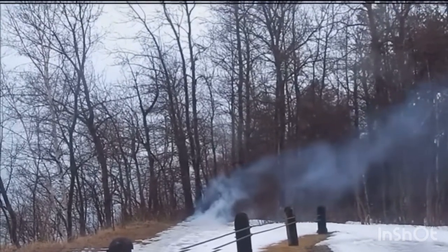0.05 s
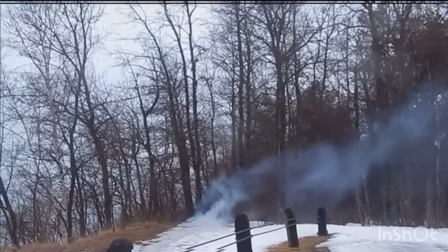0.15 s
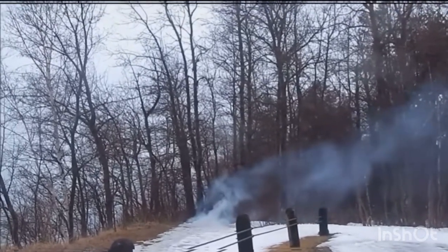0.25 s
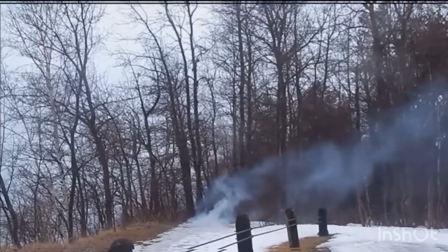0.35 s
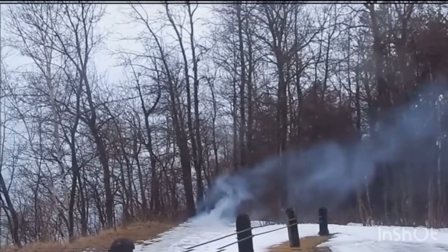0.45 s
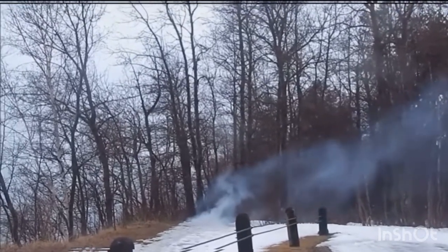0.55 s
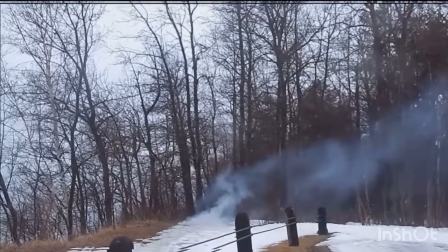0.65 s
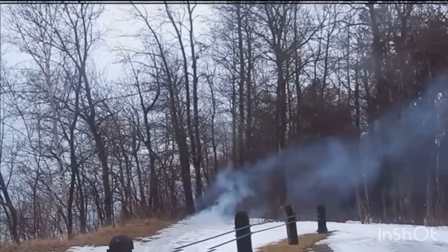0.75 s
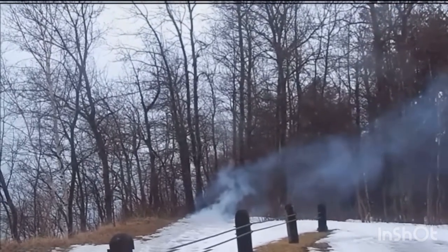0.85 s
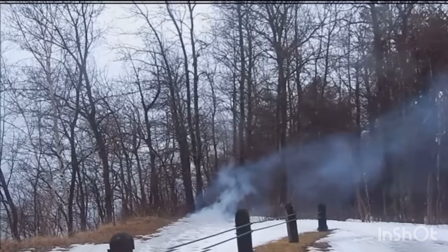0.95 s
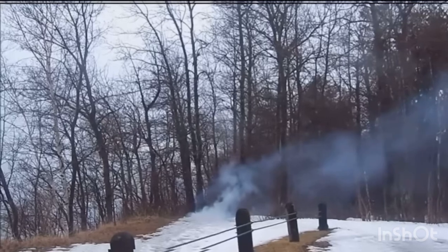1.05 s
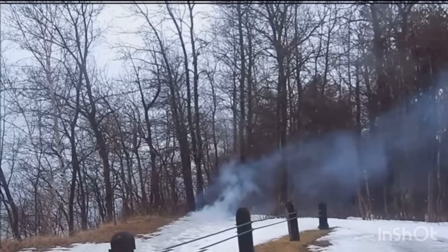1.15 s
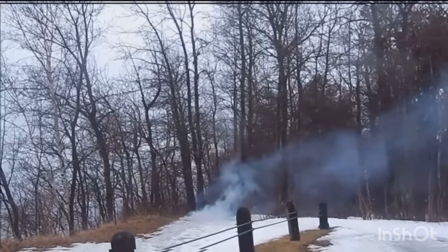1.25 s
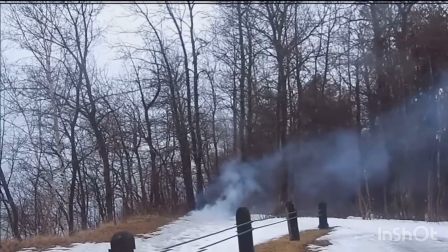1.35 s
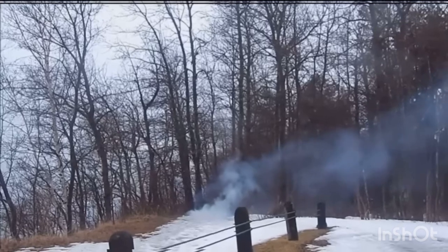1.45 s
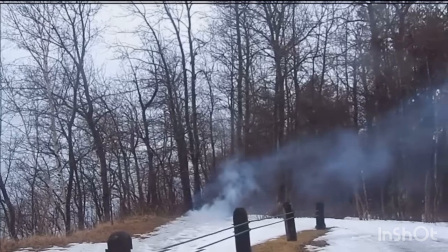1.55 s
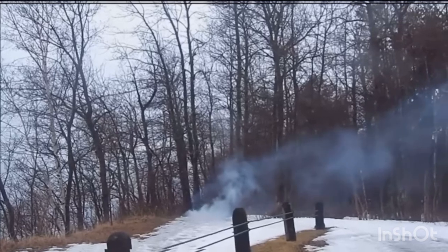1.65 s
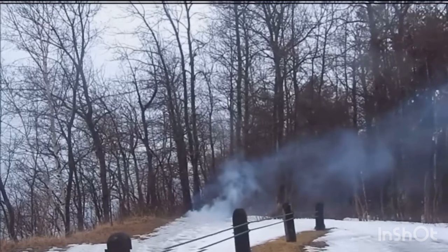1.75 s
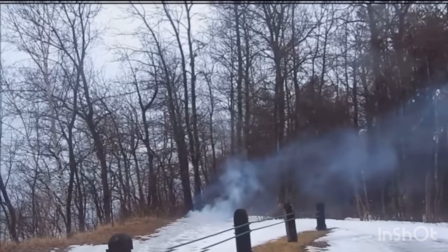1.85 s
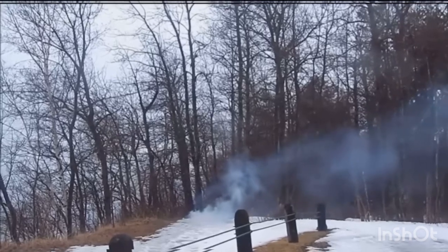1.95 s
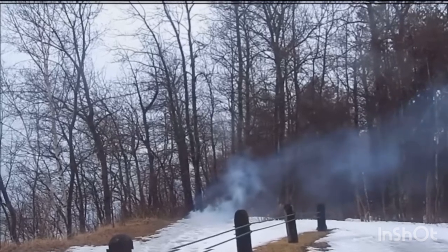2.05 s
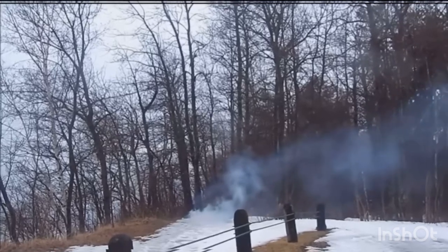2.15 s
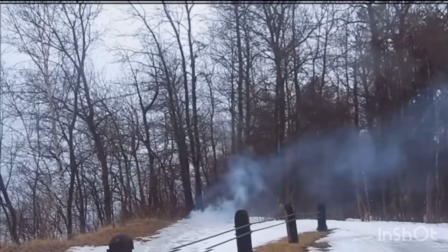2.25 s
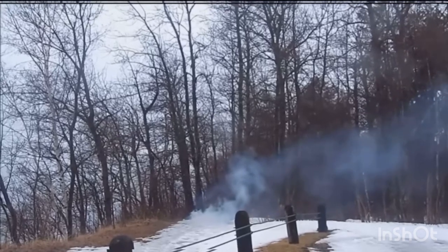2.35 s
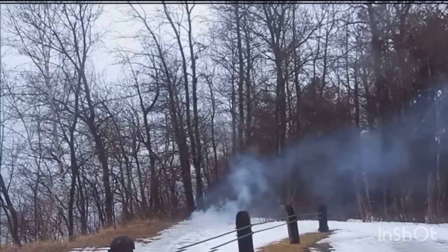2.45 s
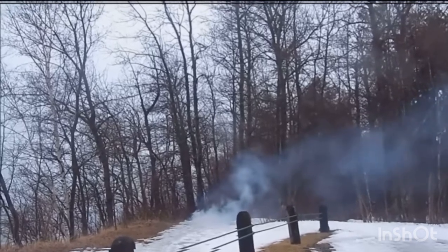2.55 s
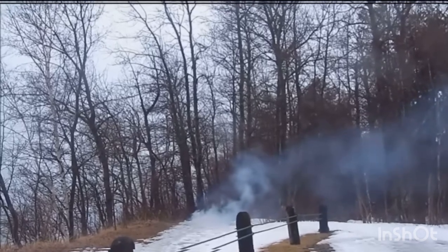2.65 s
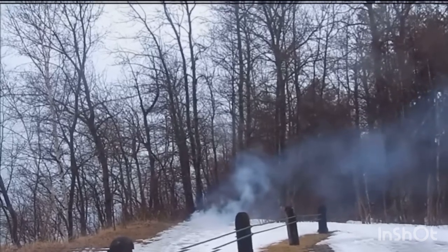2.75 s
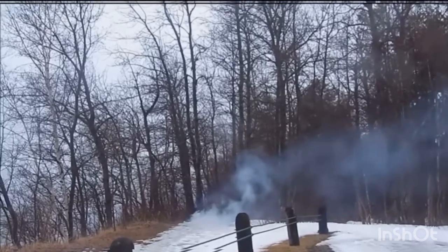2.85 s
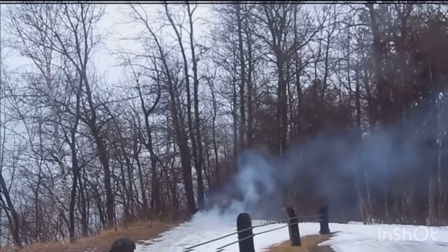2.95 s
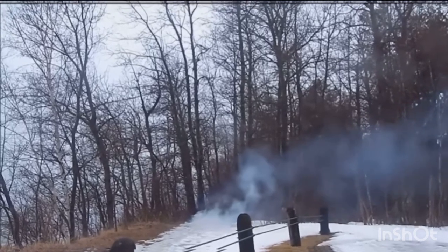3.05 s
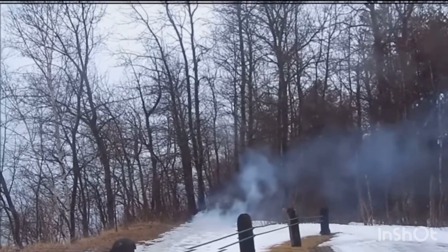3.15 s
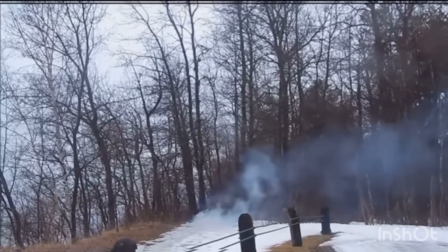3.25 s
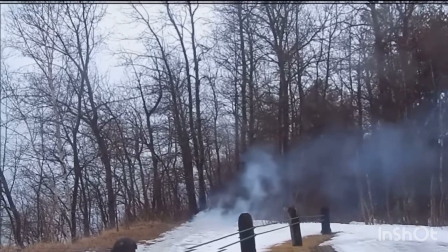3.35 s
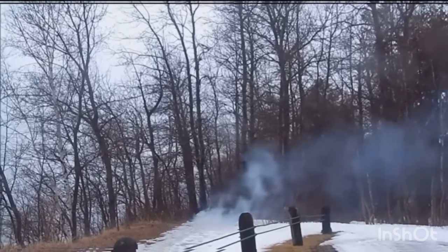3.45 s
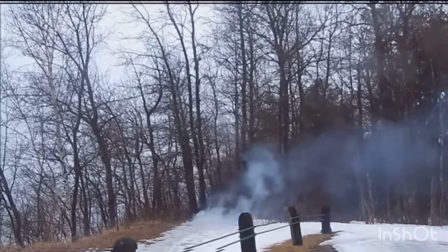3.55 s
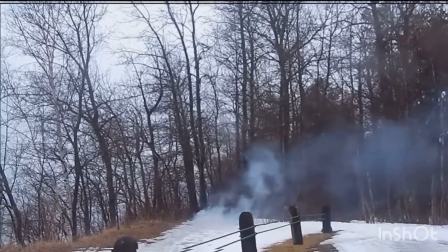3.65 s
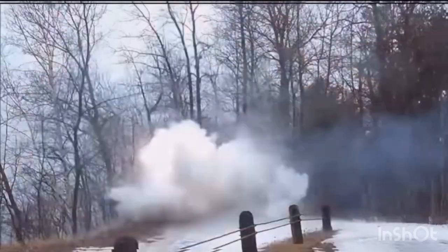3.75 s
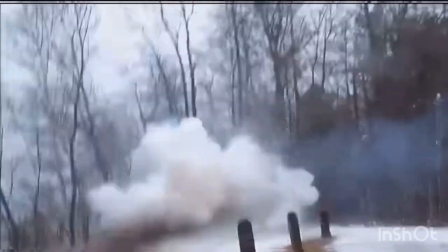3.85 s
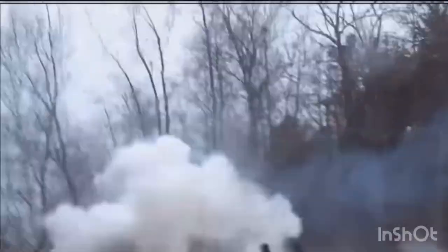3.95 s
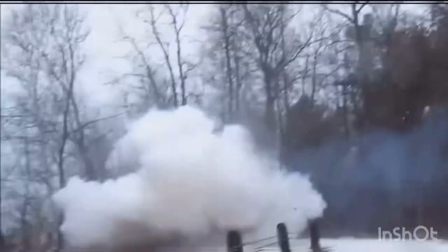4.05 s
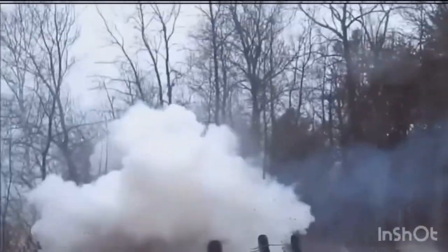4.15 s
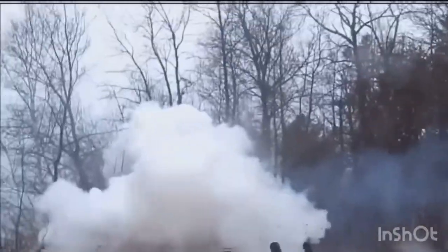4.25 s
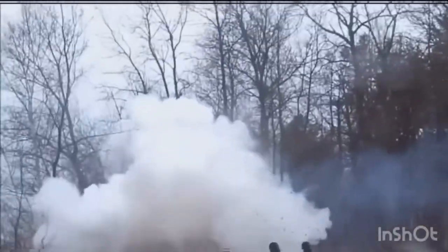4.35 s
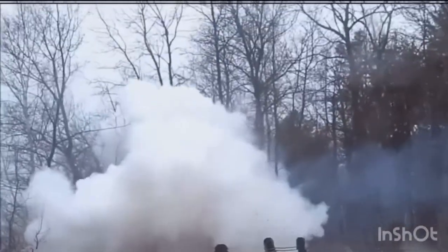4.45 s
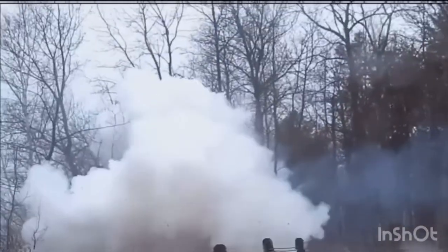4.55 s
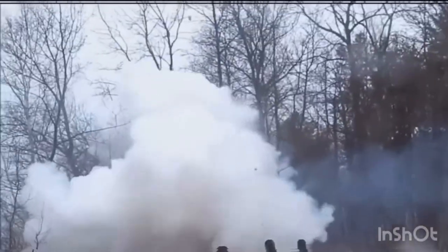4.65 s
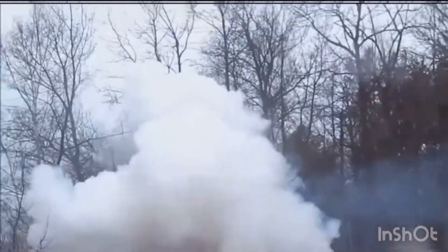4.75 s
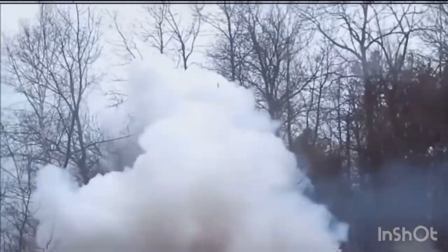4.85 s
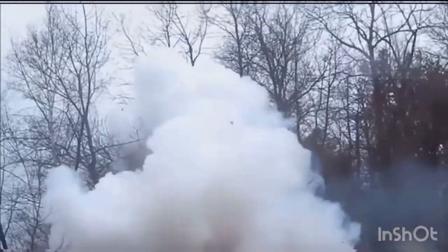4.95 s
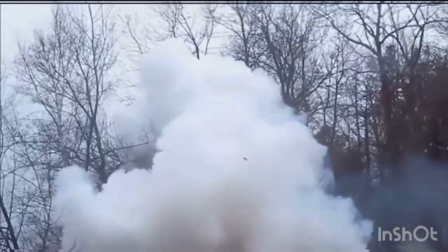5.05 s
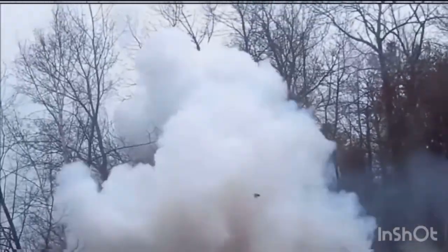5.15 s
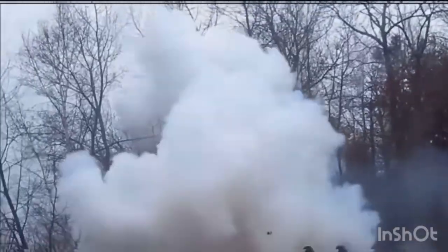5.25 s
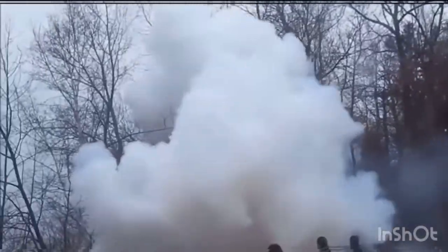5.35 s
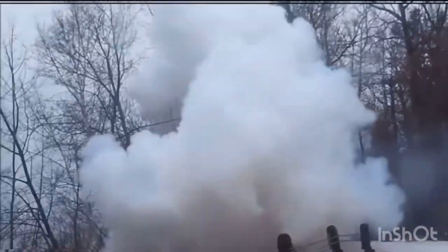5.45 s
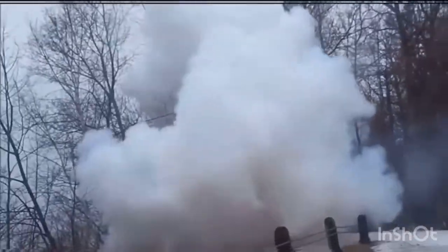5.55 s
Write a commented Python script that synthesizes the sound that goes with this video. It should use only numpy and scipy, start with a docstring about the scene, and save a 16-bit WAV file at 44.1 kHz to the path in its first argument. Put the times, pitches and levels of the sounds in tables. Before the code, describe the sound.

At the edge of a snowy wood, a large firework's fuse hisses and spits with a thin whistle over a low, throbbing hum. After nearly four seconds it flares briefly, then one very loud explosion overloads the small mono microphone. The echo rolls off through the trees, leaving a fading rumble and a few faint ticks of debris. A soft, low rush rises at the very end.

```python
"""At the edge of a snowy wood a low hum throbs on while the fuse of a large firework hisses and spits.
The fuse flares, and at about 3.8 s comes the blast: first through the frozen ground, then through the air.
It overloads a small mono recorder, which turns itself down. The echo rolls off through the trees,
treble first, a slow rumble last, while a few bits of debris tick down on the snow.
At the very end a broad rush of background noise swells up."""
import sys
import numpy as np
from scipy import signal
from scipy.fft import rfft, irfft, next_fast_len
from scipy.io import wavfile
from scipy.ndimage import uniform_filter1d

SR = 44100
rng = np.random.default_rng(int(sys.argv[2]) if len(sys.argv) > 2 else 0)


def unload_wav(signal):
    """Save mono or channel-first audio to the path in sys.argv[1] as 16-bit WAV at rate SR, clipped to [-1, 1]."""
    wavfile.write(
        sys.argv[1],
        SR,
        np.round(np.clip(np.atleast_2d(signal).T, -1, 1) * 32767).astype(np.int16),
    )


N = 247385
T = np.arange(N) / SR
BLAST_S = 3.8253
SINCE_BLAST_S = T - BLAST_S


def undb(db):
    """Turn decibels into a factor to multiply by."""
    return 10 ** (np.asarray(db) / 20)


def curve(rows):
    """Join (time, value) points with straight lines."""
    return np.interp(T, *np.transpose(rows))


def noise(colour):
    """Noise of strength 1; its colour says how strong each pitch is next to the others."""
    hz, db = np.transpose(colour)
    size = next_fast_len(N)
    log_hz = np.log(np.arange(size // 2 + 1) * SR / size + 1e-3)
    gains = undb(np.interp(log_hz, np.log(hz), db, -99, -99))
    x = irfft(rfft(rng.standard_normal(size)) * gains, size)[:N]
    return x / x.std()


def wobble(rate_hz):
    """A smooth random wobble, about 1 in size."""
    hold = int(SR / rate_hz)
    steps = np.repeat(rng.standard_normal(N // hold + 1), hold)
    x = uniform_filter1d(uniform_filter1d(steps, hold), hold)[:N]
    return x / x.std()


def lag(x, seconds):
    """Follow x slowly, starting from its first value."""
    step = 1 / (seconds * SR)
    return x[0] + signal.lfilter([step], [1, step - 1], x - x[0])


def swell(peak_s, level_db, half_length_s):
    """A bell-shaped rise and fall in loudness."""
    return undb(level_db) * np.exp(-((T - peak_s) / half_length_s) ** 2)


# The low rush of outdoor air: pitch_hz, level_db
AIR_COLOUR = [(15, 1.5), (35, 1), (55, -3.5), (100, -4), (210, -2.5), (400, -6.5), (800, -14.5),
              (1500, -27)]

def air(level_db=-71.5):
    """A faint, deep rush whose loudness drifts a little."""
    return undb(level_db + .62 * wobble(2.5)) * noise(AIR_COLOUR)


# How fast the hum throbs: time_s, pitch_hz
HUM_PITCH = [(0, 24.27), (.4, 24.33), (.8, 24.12), (1.2, 24.2), (1.8, 24.16), (2.2, 24.22), (2.6, 24.46),
             (3.0, 24.49), (3.4, 24.44), (3.7, 24.25), (5.61, 24.25)]
# The tones in the hum: pitch_multiple, level_db
HUM_OVERTONES = [(1, 0.5), (3, -2), (5, -6.5), (7, -11.5), (9, -11), (11, -14), (13, -24), (15, -12),
                 (17, -17.5), (19, -29.5), (21, -27.5), (25, -18)]

def hum(level_db=-67, waver_db=1.13, start_turn=.745):
    """Like an idling engine nearby: odd overtones line up as in a square wave, each wavering."""
    turns = start_turn + np.cumsum(curve(HUM_PITCH)) / SR + .0013 * wobble(30)
    tones = ((-1) ** (k // 2) * undb(db + waver_db * wobble(11)) * np.cos(2 * np.pi * k * turns)
             for k, db in HUM_OVERTONES)
    return undb(level_db) * sum(tones)


# Scraps landing: start_s, level_db, rise_s
DEBRIS_TICKS = [(4.756, -70, 0.012), (4.854, -76, .004), (5.058, -62.5, 0.0036), (5.365, -70.5, .004),
                (5.519, -68, 0.0043), (5.536, -73, .008)]

def debris():
    """Small scraps patter on the crusted snow in short, bright bursts."""
    loudness = np.zeros(N)
    for start_s, level_db, rise_s in DEBRIS_TICKS:
        age = np.maximum(T - start_s, 0) / rise_s
        loudness += undb(level_db) * age * np.exp(1 - age)
    return loudness * noise([(4000, -20), (6500, 1), (8500, 3), (11000, -7), (14000, -16)])


# The hiss of the gas jet, the sparks and the last flare: pitch_hz, level_db
JET_COLOUR = [(300, -32.5), (700, -6), (1200, -5.5), (1430, -4.5), (1700, -6), (2500, -7.5), (4000, -13),
              (6000, -14.5), (8600, -15), (11000, -29), (13500, -30), (15000, -61.5)]
SPARK_COLOUR = [(5000, -33.5), (7000, -13.5), (8600, -7), (10500, -21), (13000, -35)]
FLARE_COLOUR = [(3000, -20), (4300, -9), (5100, 1), (6000, -6), (7200, -3), (8800, -4), (10500, -7),
                (12000, -12), (14000, -30)]
# How loud the jet and its whistle are as the fuse burns: time_s, level_db
JET_LOUDNESS = [(0, -69.5), (1.0, -69.5), (2.2, -70.5), (3.0, -70.5), (3.6, -72.5), (3.8, -68)]
WHISTLE_LOUDNESS = [(0, -82), (.7, -83), (1.2, -78.5), (1.9, -79.5), (2.4, -79.5), (2.65, -92), (2.95, -82),
                    (3.8, -84)]

def fuse(whistle_hz=1386, flare_s=3.65, flare_rise_s=.04):
    """A sputtering gas jet with sparks and a thin whistle; it flares, then ends with the blast."""
    turns = np.cumsum(whistle_hz + 5 * wobble(25)) / SR
    whistle = np.sin(2 * np.pi * turns) * undb(curve(WHISTLE_LOUDNESS) + 1.5 * wobble(25))
    sparks = noise(SPARK_COLOUR) * undb(-76 + 2 * wobble(22.09))
    jet = noise(JET_COLOUR) * undb(curve(JET_LOUDNESS) + .45 * wobble(24.32))
    caught = np.clip((T - flare_s) / flare_rise_s, 0, 1)
    flare = undb(-72) * np.sqrt(caught) * noise(FLARE_COLOUR)
    return (jet + sparks + whistle + flare) * (T < BLAST_S)


# The thumps in the rumble: peak_s, level_db, half_length_s, pitch_hz
RUMBLE_THUMPS = [(3.948, -6, .012, 45), (3.971, -18, .012, 55), (4.022, -12, 0.024, 47.7),
                 (4.049, -12, 0.0091, 65), (4.072, -15, 0.015, 75), (4.13, -11, 0.027, 48),
                 (4.175, -15, .022, 42.3), (4.2, -15, 0.016, 50), (4.266, -14.5, 0.033, 40),
                 (4.306, -20.5, 0.011, 55), (4.359, -23, 0.025, 42), (4.419, -27, 0.032, 38),
                 (4.48, -27.5, 0.031, 45), (4.536, -28.5, 0.018, 42), (4.592, -35, .02, 48),
                 (4.665, -30.5, 0.026, 30), (4.708, -36, 0.023, 48), (4.79, -26.5, 0.027, 36),
                 (4.839, -33, .025, 30), (4.889, -34.5, .025, 40), (4.953, -37, .025, 35),
                 (5.02, -35, .025, 38), (5.075, -37, 0.023, 38), (5.163, -39, .02, 40.1),
                 (5.218, -30.5, 0.025, 33), (5.279, -31, .022, 28), (5.37, -41, .025, 35),
                 (5.437, -37, .03, 35), (5.52, -39, .025, 40), (5.59, -39, .025, 30)]

def rumble():
    """Slow swings of air pressure roll back, a swing or two in each thump."""
    return sum(swell(peak_s, db, half_s) * np.cos(2 * np.pi * (hz * (T - peak_s) + rng.random()))
               for peak_s, db, half_s, hz in RUMBLE_THUMPS)


# The six pitch ranges of the echo: pitch_hz, level_db
BOOM_COLOUR = [(40, -18.5), (75, -6.5), (130, -2), (300, -6.5), (600, -10.5), (1500, -31.5)]
ROAR_COLOUR = [(150, -24.5), (450, -4), (1000, -6.5), (2000, -12), (4000, -32.5), (8000, -56.5)]
RUSH_COLOUR = [(800, -7.5), (2200, -3), (3500, -5.5), (5500, -12), (10000, -29)]
SIZZLE_COLOUR = [(2500, -22), (5500, 0), (8000, 3.5), (9500, -5), (11500, -23), (14000, -37.5)]
CRACK_COLOUR = [(7000, -28.5), (10000, 0), (12000, -3.5), (14500, -3.5), (16000, -6)]
DEEP_THUD_COLOUR = [(18, -10), (35, -6.5), (60, 1.5), (85, 3), (120, -13.5), (200, -28.5)]
# How each range above grows and dies, timed from the blast: front_db, near_db, rise_db_per_s,
# full_s, fade_s, fade_db_per_s, far_db, far_fade_db_per_s, hiss_db, end_noise_db
ECHO_SHAPES = [(-34, -18.5, 261, 0.1, 0.28, 117, -31.5, 22.5, -54.5, -42.5),
               (-26.5, -19, 301, 0.082, 0.28, 152, -28.5, 23, -64, -49),
               (-13.5, -17.5, 60, 0.14, 0.25, 147, -24.5, 38.5, -91.5, -75),
               (-13.5, -17, 44.5, 0.087, 0.24, 142, -31, 52, -83, -71),
               (-34.5, -21, 81.5, 0.11, 0.24, 232, -69, 31, -88, -83),
               (-50, -14.5, 258, 0.16, 0.25, 178, -25, 30.5, -59, -75)]

def tree_echo(age_s, front_fade_db_per_s=900.5, end_noise_start_s=1.555, end_noise_full_s=1.794):
    """After the shock front, near trees swell and fade and far trees ring on over a lasting hiss."""
    colours = BOOM_COLOUR, ROAR_COLOUR, RUSH_COLOUR, SIZZLE_COLOUR, CRACK_COLOUR, DEEP_THUD_COLOUR
    # a broad rush of background noise swells up at the very end
    end_growth = np.interp(age_s, [end_noise_start_s, end_noise_full_s], [0, 1]) ** 2
    echo = np.zeros(N)
    for shape, colour in zip(ECHO_SHAPES, colours):
        front_db, near_db, rise, full_s, fade_s, fade, far_db, far_fade, hiss_db, end_noise_db = shape
        front = undb(front_db - front_fade_db_per_s * age_s)
        near = undb(near_db - rise * np.maximum(full_s - age_s, 0) - fade * np.maximum(age_s - fade_s, 0))
        far = undb(far_db - far_fade * age_s) * np.clip(age_s / full_s, 0, 1) ** 2
        background = undb(hiss_db) + undb(end_noise_db) * end_growth
        flutter = undb(.8 * wobble(80))  # lumps from single trunks
        echo += (front + near + far + background) * flutter * noise(colour)
    return echo


# Echoes that stand out: peak_s, level_db, half_length_s
SLAP_ECHOES = [(3.91, -17.5, 0.019), (3.97, -20, 0.014), (4.06, -12, 0.02), (4.1, -20, 0.011),
               (4.545, -36, 0.018), (4.78, -41, 0.017)]

def slaps():
    """The boom comes back as a few separate, dull slaps."""
    return sum(swell(*row) for row in SLAP_ECHOES) * noise(BOOM_COLOUR)


def microphone_ring(age_s, pitch_hz=7900, wander_hz=800, fade_db_per_s=170):
    """The shock sets the microphone ringing, hardest at the first strike."""
    strike_db = 4 * np.exp(-age_s / .004)
    level_db = -17 - fade_db_per_s * age_s + strike_db + 4.5 * wobble(500)
    turns = np.cumsum(pitch_hz + wander_hz * wobble(600)) / SR
    return undb(level_db) * np.sin(2 * np.pi * turns)


def ground_wave(pitch_hz=108, growth_cycles=.34, level_db=-27):
    """The shock runs faster through frozen ground, so a low tone swells just before the bang."""
    growth = np.exp(np.minimum(SINCE_BLAST_S, 0) * pitch_hz / growth_cycles)
    return undb(level_db) * growth * np.cos(2 * np.pi * pitch_hz * SINCE_BLAST_S) * (T < BLAST_S)


# The air shock and its bounces off ground and bank: delay_s, level_db, half_length_s
AIR_SHOCKS = [(.0006, -3.5, 0.0003), (.0017, 2, 0.0004), (.0068, -8.5, .0011)]

def air_shock():
    """Each shock is shaped like an N: the pressure jumps up, falls straight down and jumps back."""
    pressure = np.zeros(N)
    for delay_s, level_db, half_length_s in AIR_SHOCKS:
        ramp = (SINCE_BLAST_S - delay_s) / half_length_s
        pressure -= undb(level_db) * ramp * (np.abs(ramp) < 1)
    return pressure


def blast():
    """The firework goes off: the ground wave first, then all that comes through the air."""
    age_s = np.maximum(SINCE_BLAST_S, 0)
    bang = air_shock() + tree_echo(age_s) + microphone_ring(age_s) + slaps() + rumble()
    return ground_wave() + bang * (T >= BLAST_S)


def scene():
    """All the sounds together, the same on the left and right."""
    mono = hum() + air() + fuse() + blast() + debris()
    return np.array([mono, mono])


def record(dry, target_db=-12.5, max_boost_db=35, recover_db_per_s=2, ceiling=.3):
    """A small recorder boosts quiet sound, turns down for the blast, overloads and slowly recovers."""
    x = dry[0]
    ahead = int(.028 * SR)  # the volume control looks a little ahead
    loud_db = 20 * np.log10(np.abs(np.r_[x[ahead:], np.zeros(ahead)]) + 1e-9)
    wanted_db = np.clip(target_db - loud_db, 0, max_boost_db)
    recovery_db = recover_db_per_s * T
    gain_db = np.minimum.accumulate(wanted_db - recovery_db) + recovery_db
    boosted = x * undb(lag(gain_db, seconds=.06))
    squashed = ceiling * np.tanh(boosted / ceiling)
    squashed /= 1 + 2.4 * lag(squashed ** 2, seconds=.019) / ceiling  # long overloads lower the ceiling
    # the microphone favours one high band, and the very top is cut off
    peak_hz, width_hz, top_hz = 8470, 2300, 14050
    peak = signal.lfilter(*signal.iirpeak(peak_hz, peak_hz / width_hz, fs=SR), squashed)
    top_cut = signal.ellip(14, .2, 80, top_hz, fs=SR, output="sos")
    mono = signal.sosfilt(top_cut, squashed + undb(-9) * peak)
    return np.array([mono, mono])


dry = scene()
out = record(dry)
unload_wav(out)
```